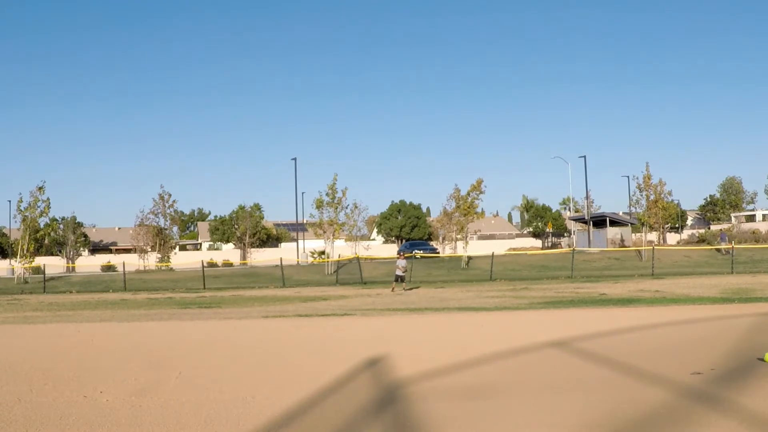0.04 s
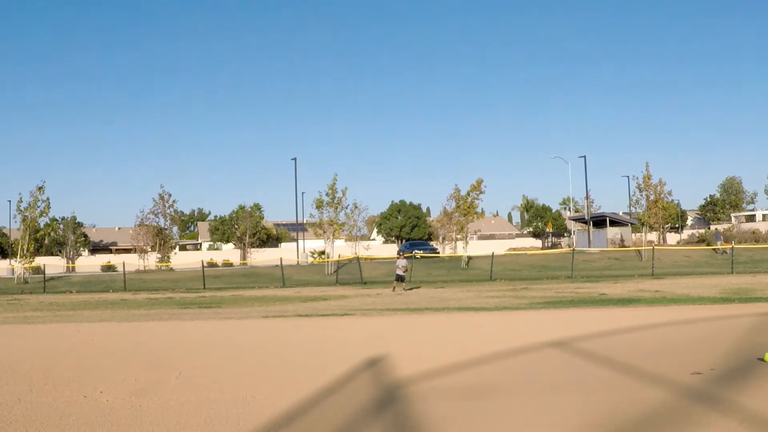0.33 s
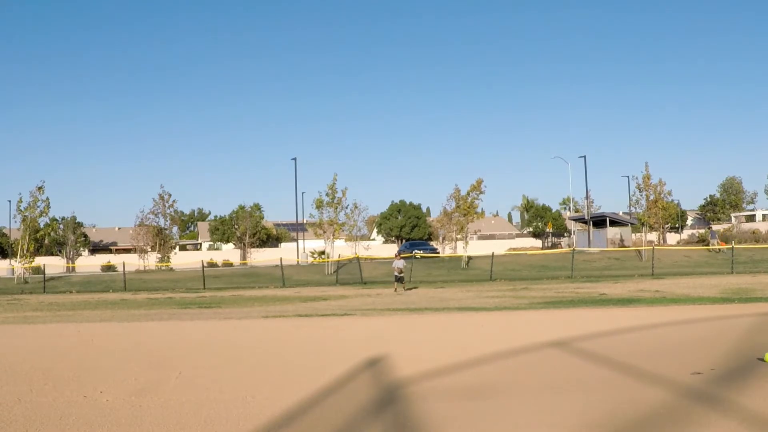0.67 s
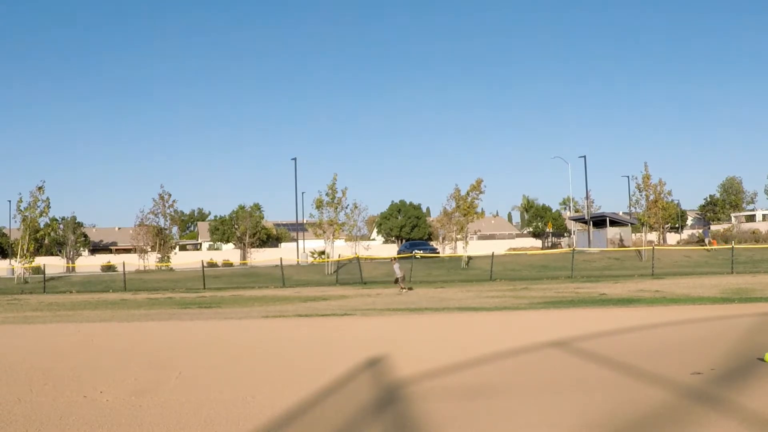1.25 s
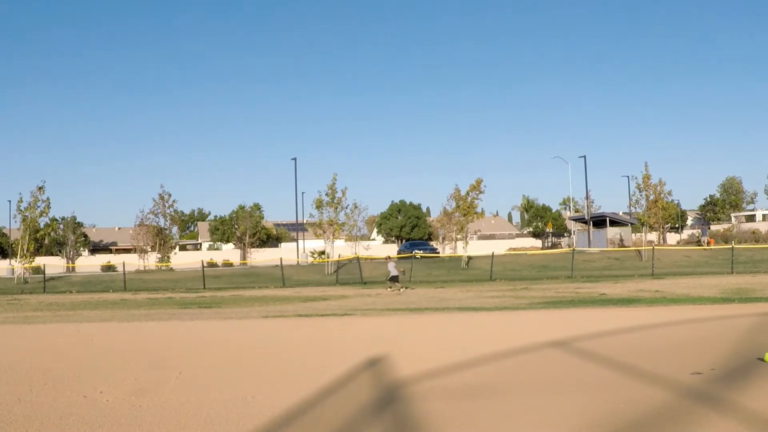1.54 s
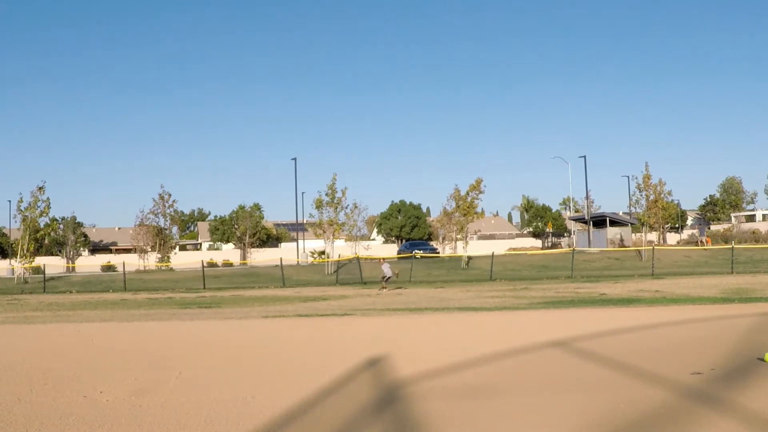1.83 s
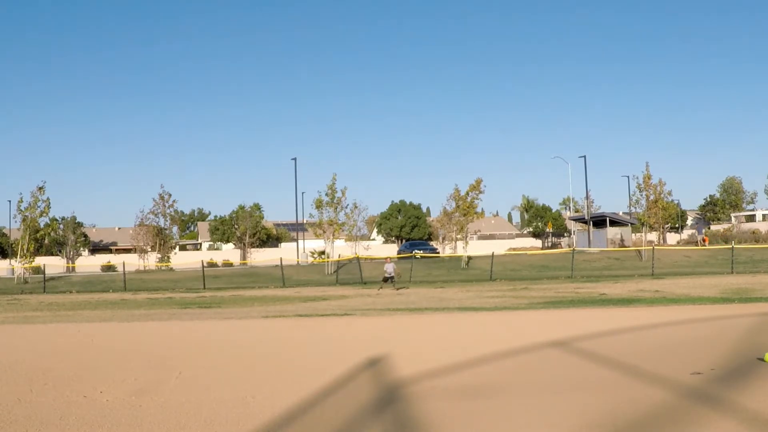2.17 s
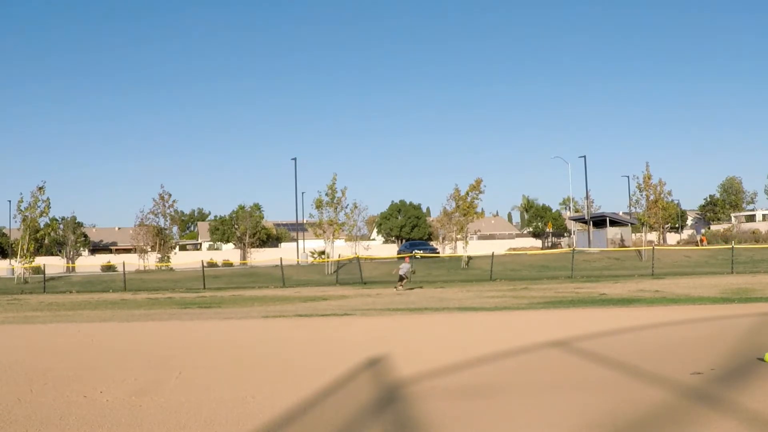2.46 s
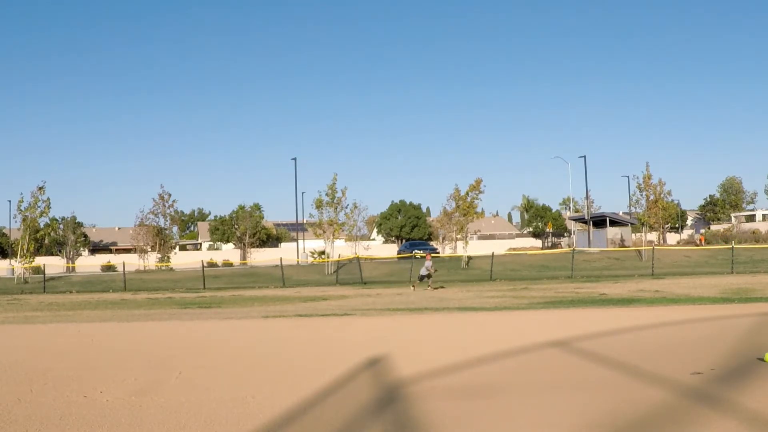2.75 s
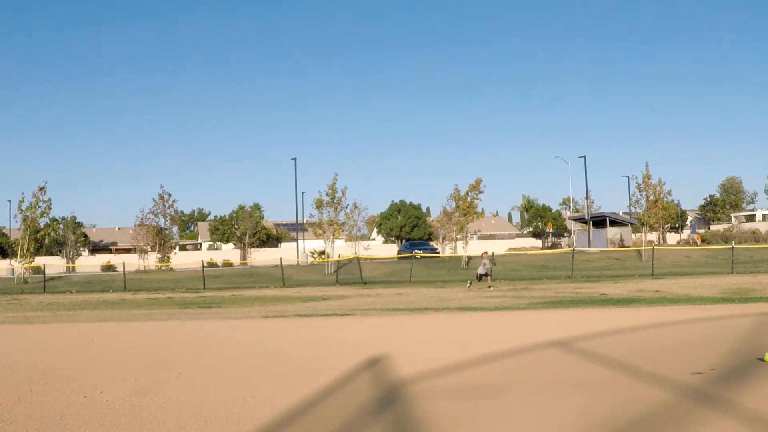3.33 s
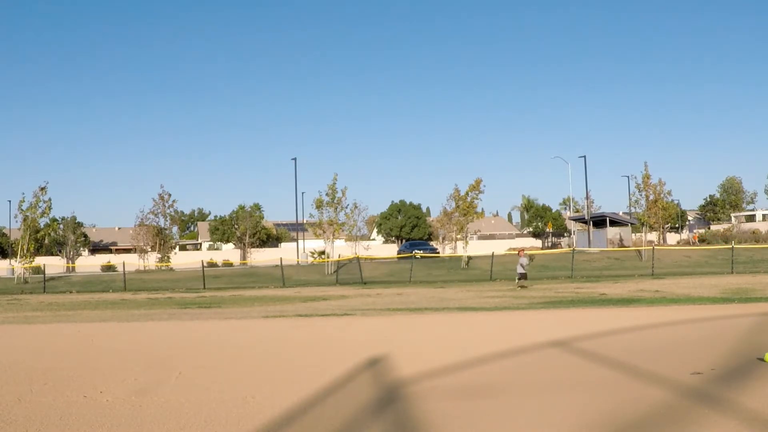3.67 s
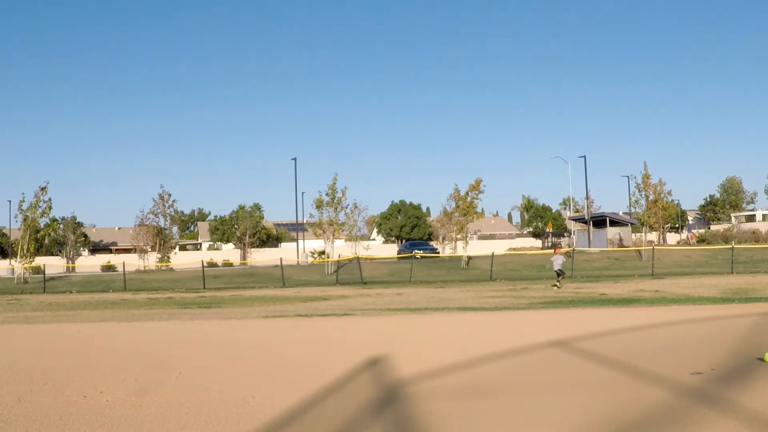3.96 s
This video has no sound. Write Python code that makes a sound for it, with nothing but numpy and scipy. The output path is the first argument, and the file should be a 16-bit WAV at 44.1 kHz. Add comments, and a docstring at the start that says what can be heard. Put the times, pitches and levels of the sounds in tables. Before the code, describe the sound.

A ball is knocked once, close by, at about 1.2 seconds: a sharp crack and hollow thump with a short ring and faint echoes across an open field. Breeze and distant traffic rumble throughout under a thin hiss. Faint birds chirp at the start, along with a soft dry rasp, and again from about 2.7 to 3 seconds. A far engine drone swells from 2 seconds on.

```python
"""You hear a low rumble of breeze and traffic over an open ball field, with small birds chirping far off.
A ball is knocked once, close by: the hit cracks, thumps and sets off a short ringing.
Surfaces across the field throw back faint echoes. A far engine drones, swelling as it slows.
Behind it all lie a faint rasp, a soft wash of town noise and a thin microphone hiss."""
import sys
import numpy as np
from scipy import signal
from scipy.fft import rfft, irfft
from scipy.io import wavfile

SR = 44100
rng = np.random.default_rng(int(sys.argv[2]) if len(sys.argv) > 2 else 0)


def pcm_store(signal):
    """Save signal as 16-bit PCM."""
    levels = np.round(np.clip(np.atleast_2d(signal), -1, 1) * 32767)
    wavfile.write(sys.argv[1], SR, levels.astype(np.int16).T)


N = 176400
T, HZ = np.arange(N) / SR, np.fft.rfftfreq(N, 1 / SR)
KNOCK_S = 1.186

# Tones the knock rings with. Each row: pitch in Hz, dB during contact, dB afterwards, fade in seconds.
# A fade is always the time taken to drop by 60 dB.
RING_TONES = [(440, -33, -52, .04), (570, -41, -47, .07), (1215, -34, -49, .17), (1357, -36.5, -42, .1),
              (1655, -34, -47, .06), (1775, -37, -50, .24), (2080, -41, -47, .02), (2190, -41, -47, .03),
              (3050, -64, -54, .12), (3290, -66, -55, .09), (3700, -58, -54, .06), (4080, -58, -53, .055)]
# Tone colours of noises. Each row: frequency in Hz, relative strength in dB.
CRACK_COLOUR = [(100, -18), (200, 5), (480, 12), (800, -3), (1100, 1), (2200, -2), (2600, -12), (4000, -8),
                (5200, -9), (6300, -7), (8000, -9), (10000, -20), (14000, -36)]  # the hit
TICK_COLOUR = [(1000, -14), (4000, -15), (5400, -9), (6300, 11), (7200, -6), (8400, -4), (10000, -17),
               (14000, -34)]  # the bright first touch
ECHO_COLOUR = [(400, -4), (900, 3), (1300, 5), (2200, -8), (3100, 4), (4100, -3), (5000, -11), (6800, -9),
               (9000, -24), (14000, -35)]  # the scattered knock
TAIL_COLOUR = [(500, -10), (920, 2), (1050, 0), (1220, 0), (1350, -2), (1520, -10), (1750, 1), (2000, -16),
               (3100, -15), (6000, -29), (12000, -45)]  # the ring of the surroundings
RASP_COLOUR = [(1200, -35), (2050, -9), (2350, -10), (2600, 1), (2850, -12), (3150, -7), (4000, -20),
               (7000, -40)]
RUMBLE_COLOUR = [(8, -5), (18, 2.5), (28, 3.5), (45, 2), (65, 1.5), (100, -1), (135, -2), (165, -11),
                 (200, -14.5), (250, -16.5), (310, -24.5), (400, -31.5), (550, -44.5), (1000, -69),
                 (2500, -91)]
TOWN_COLOUR = [(100, -0.5), (300, -1), (500, 2), (700, -3), (1000, -8), (2000, -17), (3000, -24),
               (4500, -30), (7000, -26), (8500, -50), (14000, -63)]
HISS_COLOUR = [(1000, -25.5), (3500, -8), (5000, -12.5), (5600, -7), (6100, 0.5), (6800, -7), (7700, -2.5),
               (8100, -6), (9500, -4.5), (10500, -7.5), (11500, -11.5), (13000, -15), (14500, -23)]
# Echoes. Each row: delay in seconds, level in dB, rise and fade in seconds, favoured pitch in Hz.
FIELD_ECHOES = [(.0112, -38, .0012, .045, 3400), (.088, -44.5, .003, .07, 950),
                (.256, -50, .002, .04, 5000), (.265, -49.5, .0025, .08, 2600), (.268, -50, .004, .1, 1100)]

# Engine speed. Each row: time in seconds, cycles per second.
ENGINE_SPEED = [(0, 19.2), (.5, 20.3), (1.15, 21.4), (1.6, 21.0), (2.05, 21.7), (2.4, 21.3), (3.0, 20.25),
                (3.5, 18.9), (4, 20.2)]
# Loudness of the drone. Each row: time in seconds, level in dB.
DRONE_LEVEL = [(0, -26.5), (.5, -30.5), (1.0, -33), (1.5, -32), (2.05, -26.5), (2.45, -21), (3.0, -18.5),
               (3.5, -20), (4, -18)]
# Tones of the drone. Each row: multiple of the engine speed, dB added to the drone's level.
DRONE_TONES = [(3, -3.5), (4, -4), (5, -6.5)]
# Passing engine tones. Each row: multiple of the speed, peak time and width in seconds, level in dB.
ENGINE_SWELLS = [(2, 0.049, 0.25, -23), (2, 0.53, 0.14, -24.5), (2, 2.95, 0.75, -32.5),
                 (6, 0.37, .45, -29.5), (7, 2.07, 0.34, -36)]

# Thin bird notes. Each row: start and length in seconds, pitch in Hz, share of the pitch lost,
# level in dB, roughness from 0 to 1.
BIRD_CHIRPS = [(0.052, 0.11, 7380, 0.24, -53, 0.86), (.21, .085, 6900, .15, -59, 0.66),
               (2.66, 0.055, 6790, .065, -56, .15), (2.799, 0.035, 6500, .06, -50.5, 0.3),
               (2.833, 0.02, 4850, 0.05, -64, .4)]
# Bird whistles. Each row: start, upward flick and end in seconds, pitch in Hz, level in dB.
BIRD_WHISTLES = [(-.03, .032, .043, 4220, -58), (2.96, 3.005, 3.019, 4070, -55.7)]

# Slow changes in the town noise. Each row: time in seconds, dB added.
TOWN_LEVEL = [(0, 1.7), (.6, 1.5), (1.4, 1), (2.2, 1.5), (3, 1.5), (4, 1)]
# How alike left and right are. Each row: frequency in Hz, likeness (1 same, 0 unrelated, -1 opposite).
TOWN_LIKENESS = [(100, 1), (300, -0.59), (550, -0.82), (750, -0.72), (1100, -0.5), (2000, -0.3),
                 (3000, 0.055), (4000, 0.056), (5000, -0.17), (7000, -0.14), (8500, 0)]
HISS_LIKENESS = [(4000, 0.96), (5500, 0.58), (6100, .78), (6700, 0.39), (7300, .6), (8000, 0.97),
                 (10000, 0.98), (13000, 0.96)]
# Phase between the microphone's two openings. Each row: frequency in Hz, left's lead in radians.
RUMBLE_LEAD = [(30, -0.21), (100, -0.013), (170, 0.32), (280, 0.67), (380, 0.24), (600, -0.23), (1500, 0)]
# How the noises lean to one side. Each row: frequency in Hz, left minus right in dB.
NOISE_BALANCE = [(25, -2.3), (60, -3), (125, -3.9), (250, -3.5), (500, -2.5), (1000, -.5), (3000, 1),
                 (6000, -1.5), (12000, 0)]


def ball_knock(thump_hz=268, thump_s=.0085, ring_rise_s=.0016, contact_s=.0072, damping_s=.014):
    """A hollow thump and a crack; the tones sound hard while the contact lasts, then ring on faintly."""
    age = np.maximum(T - KNOCK_S, 0)
    thump_age = np.clip(age - .0009, 0, thump_s)
    thump = amp(-10.8) * np.sin(np.pi * thump_age / thump_s) * np.sin(2 * np.pi * thump_hz * thump_age)
    contact = np.minimum(age / ring_rise_s, 1) * fade(np.maximum(age - contact_s, 0), damping_s)
    ringing = 0
    for hz, contact_db, free_db, fade_s in RING_TONES:
        level = amp(contact_db) * contact + amp(free_db) * strike(KNOCK_S, ring_rise_s, fade_s)
        ringing += level * np.sin(2 * np.pi * hz * (age - ring_rise_s))
    crack = amp(-27.7) * strike(KNOCK_S, rise_s=.001, fade_s=.036) * noise(CRACK_COLOUR, likeness=.64)
    tick = amp(-21.5) * strike(KNOCK_S, rise_s=.0017, fade_s=.008) * noise(TICK_COLOUR, likeness=.44)
    return thump * pan(db=-7.5) + (ringing + crack + tick) * pan(db=-3)


def field_echoes():
    """Each surface throws back its own part of the knock; a faint ring lingers around the field."""
    echoes = 0
    for delay, db, rise_s, fade_s, hz in FIELD_ECHOES:
        surface_db = -14 * np.log2((HZ + 1) / hz) ** 2  # 14 dB weaker one octave away
        scattered = noise(ECHO_COLOUR, likeness=.5, colour_db=surface_db)
        echoes += amp(db) * strike(KNOCK_S + delay, rise_s, fade_s) * scattered
    tail = amp(-46.3) * strike(KNOCK_S, rise_s=.0094, fade_s=.66) * noise(TAIL_COLOUR, likeness=-.091)
    return echoes + tail


def far_engine(waver_db=.8, hum_hz=96.5):
    """An engine drones at multiples of its speed, beside a steady machine hum."""
    speed = curve(ENGINE_SPEED)
    cycles = np.cumsum(speed) / SR + rng.random()
    drone = swells = 0
    for multiple, db in DRONE_TONES:
        level = amp(db + curve(DRONE_LEVEL) + waver_db * drift(hz=2.2))
        stagger = np.pi / 2 * multiple ** 2  # tones out of step drone rather than thud
        drone += level * np.sin(2 * np.pi * multiple * cycles + stagger)
    for multiple, peak_s, width_s, db in ENGINE_SWELLS:
        swells += amp(db) * np.exp(-((T - peak_s) / width_s) ** 2 / 2) * tone(multiple * speed)
    hum = amp(-28 + waver_db * drift(hz=5.6)) * tone(hum_hz + .34 * drift(hz=2.2))
    return np.sqrt(2) * (drone + swells + hum) * pan(db=-3.5)


def bird_chirp(start, length, hz, fall, db, roughness):
    """A falling, slightly arched note; rough ones flutter in pitch and loudness."""
    progress = np.clip((T - start) / length, 0, 1)
    arch = np.sin(np.pi * progress)
    pitch = hz * (1 - fall * progress + .025 * (arch - .5) + .052 * roughness * drift(hz=540))
    return amp(db + 3.2 * roughness * drift(hz=100)) * arch * tone(pitch)


def bird_whistle(start, flick, end, hz, db, flick_width_s=.00494):
    """A held note swells, leaps up in pitch as it thins, and breaks off on the way down."""
    progress = np.clip((T - start) / (end - start), 0, 1)
    leap = np.exp(-((T - flick) / flick_width_s) ** 2)
    pitch = hz * (1 + .018 * drift(hz=380) + .33 * leap)
    return amp(db - 3.5 * leap) * np.sin(np.pi * progress ** 2) * tone(pitch)


def far_birds():
    """Birds call far off, and trees and fences smear their notes."""
    chirps = sum(bird_chirp(*row) for row in BIRD_CHIRPS) * pan(db=-4)
    whistles = sum(bird_whistle(*row) for row in BIRD_WHISTLES) * pan(db=-6)
    calls = chirps + whistles
    smear = rng.standard_normal((2, N)) * strike(0, rise_s=.004, fade_s=.15)
    smear /= np.linalg.norm(smear[0])
    return calls + amp(-7) * signal.fftconvolve(calls, smear, axes=1)[:, :N]


def far_rasp():
    """A short, dry rasp in the distance."""
    return amp(-54) * strike(start=.205, rise_s=.008, fade_s=.29) * noise(RASP_COLOUR, likeness=.5)


def breeze_and_traffic():
    """Moving air and traffic blend into a low, lumpy rumble."""
    rumble = noise(RUMBLE_COLOUR, likeness=.96, lead=spectrum(RUMBLE_LEAD))
    return amp(-21.5 + .62 * drift(hz=11)) * rumble


def town_wash():
    """The distant town makes a wide, gently wavering noise."""
    level = amp(-45.5 + curve(TOWN_LEVEL) + .5 * drift(hz=10))
    return level * noise(TOWN_COLOUR, spectrum(TOWN_LIKENESS))


def microphone_hiss():
    """The microphone adds a thin, steady hiss."""
    return amp(-60.5) * noise(HISS_COLOUR, spectrum(HISS_LIKENESS))


def amp(db):
    """Turns decibels into a number to multiply by."""
    return 10 ** (np.asarray(db) / 20)


def unit(x):
    """Scales a signal to an average strength (rms) of 1."""
    return x / np.sqrt(np.mean(x ** 2) + 1e-20)


def pan(db):
    """Left and right gains; negative dB moves a sound to the right."""
    return amp(np.array([[.5], [-.5]]) * db)


def curve(points):
    """Joins a table's points over time."""
    return np.interp(T, *np.transpose(points))


def spectrum(points):
    """Joins a table's points over frequency, with octaves evenly spaced."""
    hz, value = np.transpose(points)
    return np.interp(np.log(HZ + 1), np.log(hz + 1), value)


def noise(colour, likeness, lead=0, colour_db=0):
    """Stereo noise with a given tone colour and likeness between left and right."""
    shared, separate = rfft(rng.standard_normal((2, N)))
    left = shared * np.exp(1j * lead)
    right = likeness * shared + np.sqrt(1 - likeness ** 2) * separate
    gains = amp(spectrum(colour) + colour_db) * pan(spectrum(NOISE_BALANCE))
    return unit(irfft(np.array([left, right]) * gains, N))


def drift(hz):
    """A random wobble of strength 1, up to about hz times a second."""
    keep_slow = (HZ > 0) * np.exp(-(HZ / hz) ** 2)
    return unit(irfft(rfft(rng.standard_normal(N)) * keep_slow, N))


def tone(hz):
    """A pure tone that follows a changing pitch."""
    return np.sin(2 * np.pi * (np.cumsum(hz) / SR + rng.random()))


def fade(age, fade_s):
    """Dies away by 60 dB every fade_s seconds."""
    return np.exp(-np.log(1000) * age / fade_s)


def strike(start, rise_s, fade_s):
    """The loudness of a hit: a quick rise, then a fade."""
    age = np.maximum(T - start, 0)
    return (1 - np.exp(-(age / rise_s) ** 2)) * fade(age, fade_s)


def scene():
    """Everything heard from the edge of the field."""
    background = breeze_and_traffic() + town_wash() + microphone_hiss()
    return background + far_engine() + ball_knock() + field_echoes() + far_birds() + far_rasp()


def record(dry):
    """Cuts away the highest treble, above 14800 Hz."""
    treble_cut = signal.firwin(511, 14800, window=("kaiser", 9), fs=SR)
    return signal.oaconvolve(dry, treble_cut[None], "same")


dry = scene()
out = record(dry)
pcm_store(out)
```